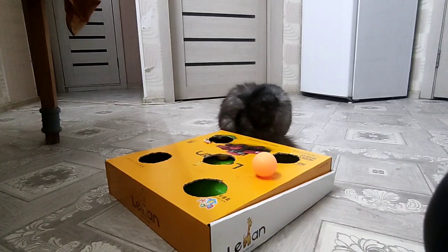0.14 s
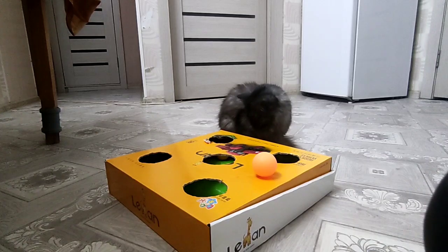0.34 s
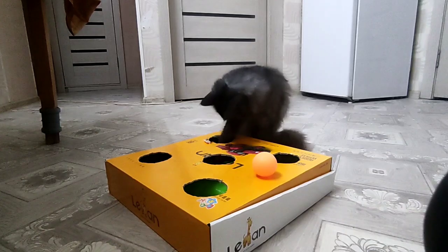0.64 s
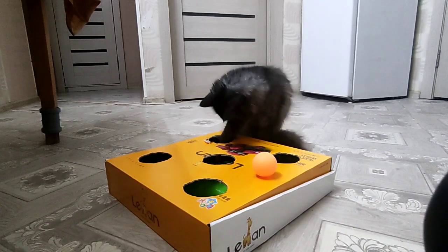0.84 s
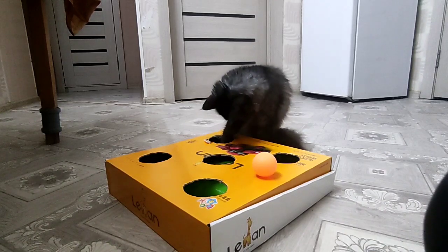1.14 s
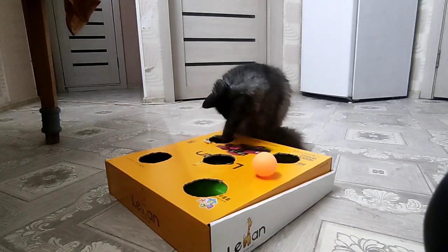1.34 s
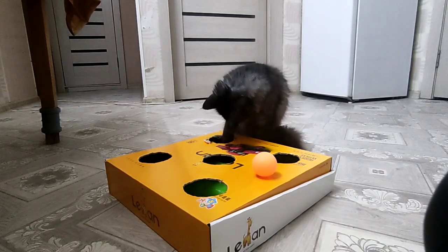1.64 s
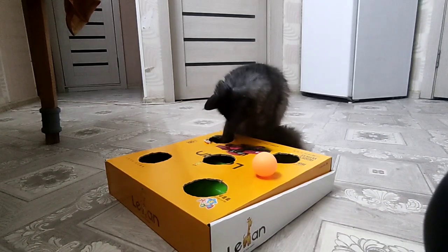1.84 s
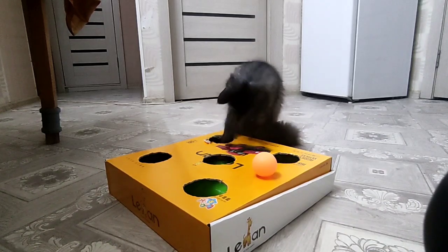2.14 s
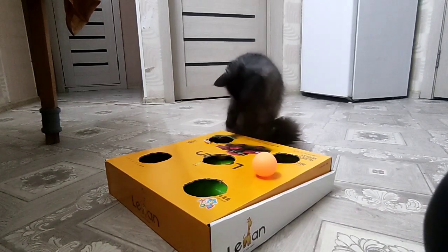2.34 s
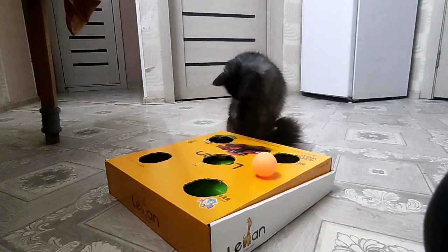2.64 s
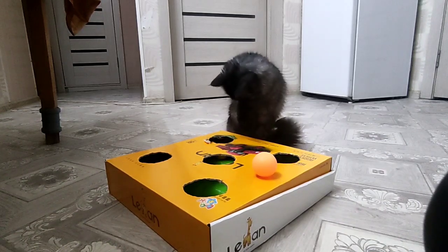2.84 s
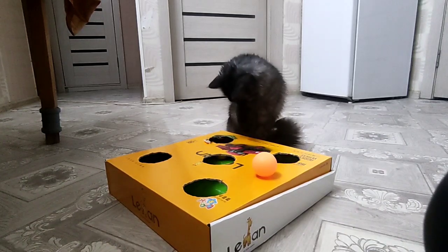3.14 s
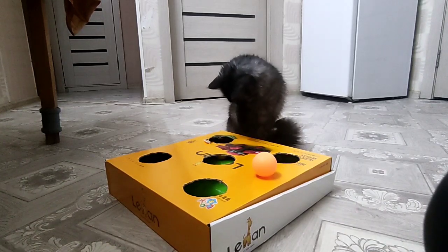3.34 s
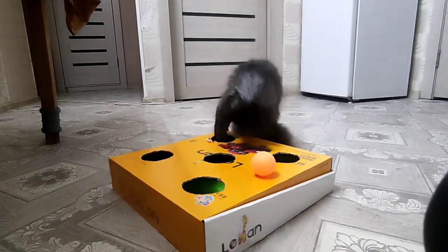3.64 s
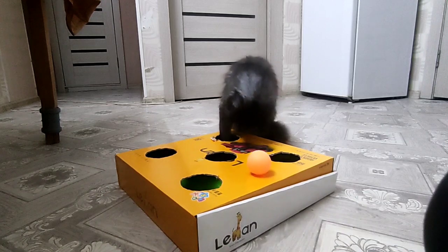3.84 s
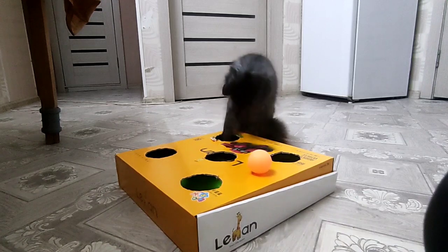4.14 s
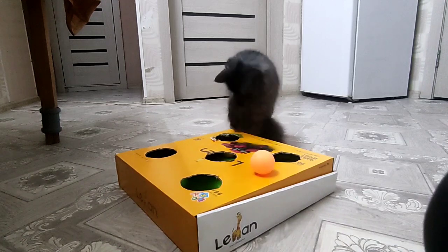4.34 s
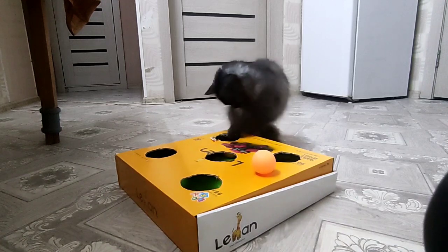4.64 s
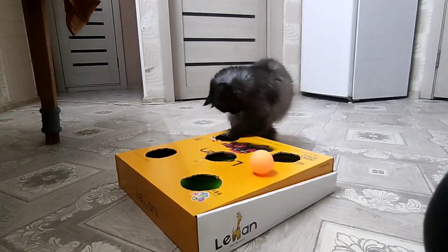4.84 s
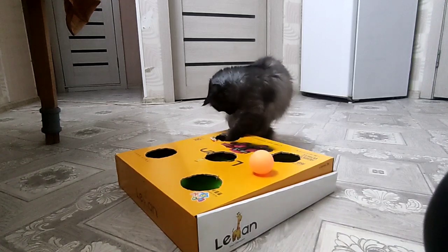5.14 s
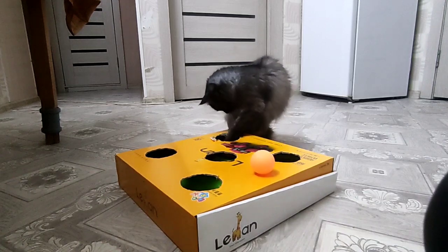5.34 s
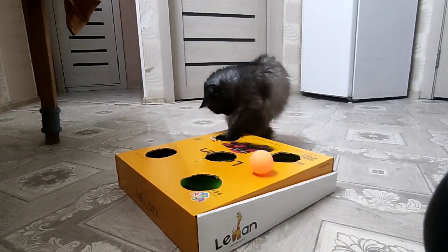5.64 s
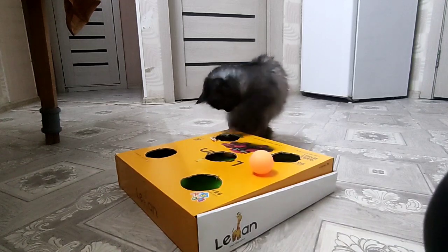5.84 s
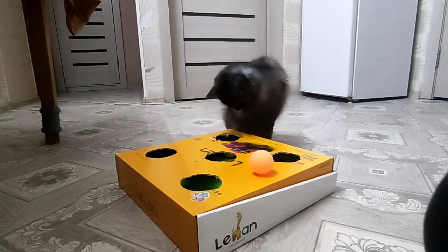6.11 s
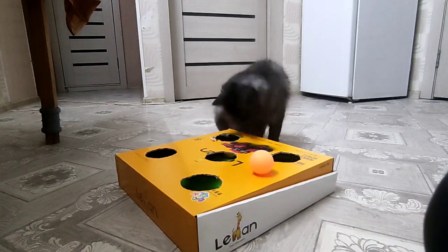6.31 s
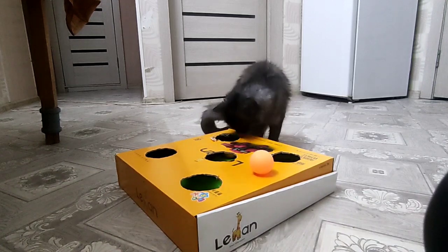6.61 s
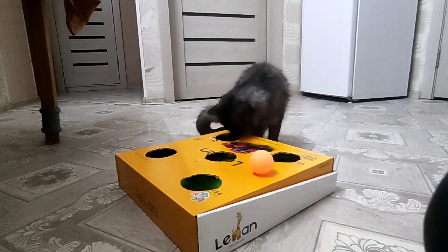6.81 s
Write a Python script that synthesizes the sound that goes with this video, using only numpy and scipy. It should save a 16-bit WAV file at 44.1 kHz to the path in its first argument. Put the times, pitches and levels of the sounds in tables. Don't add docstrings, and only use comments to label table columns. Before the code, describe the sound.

Light, uneven hollow taps on a cardboard box as a cat reaches into its holes, with dry scrapes and tiny clicks in a bare room.

```python
import sys
import numpy as np
from scipy import signal
from scipy.fft import rfft, irfft, next_fast_len
from scipy.io import wavfile
from scipy.ndimage import uniform_filter1d, minimum_filter1d

SR = 44100
rng = np.random.default_rng(int(sys.argv[2]) if len(sys.argv) > 2 else 0)


def to_wav(s):
    ch = np.atleast_2d(s).T
    pcm = np.round(np.clip(ch, -1, 1) * 32767)
    wavfile.write(sys.argv[1], SR, pcm.astype(np.int16))


def boost_factor(decibels):
    exponent = np.asarray(decibels, float) / 20
    return 10 ** exponent


N = 307377


def evened(x):
    return x / np.sqrt(np.mean(x ** 2) + 1e-20)


def read(points, hz):
    f, value = np.transpose(points)
    return np.interp(np.log(hz + 1), np.log(f + 1), value)


def add(mix, start_s, sound):
    part = mix[:, round(start_s * SR):][:, :sound.shape[1]]
    part += sound[:, :part.shape[1]]


def colour(x, gain):
    size = next_fast_len(x.shape[-1])
    spectrum = rfft(x, size) * gain(np.fft.rfftfreq(size, 1 / SR))
    return irfft(spectrum, size)[..., :x.shape[-1]]


def pair(a, b, same):
    def alike(hz):
        return np.clip(read(same, hz), 0, 1)

    def unlike(hz):
        return np.sqrt(1 - alike(hz) ** 2)

    return np.array([a, colour(a, alike) + colour(b, unlike)])


# frequency_hz, density_db [dB per Hz]
HISS_SPECTRUM = [(3.5, -2), (6, 5.5), (17, -4.5), (30, -12.5), (59, -18), (220, -26.5), (530, -34),
                 (900, -37), (1700, -39.5), (4500, -42), (7000, -43), (9000, -40), (11500, -42.5),
                 (14300, -45)]
# frequency_hz, coherence [0 to 1]
HISS_COHERENCE = [(60, 0.085), (180, 0.23), (550, 0.15), (1650, 0.18), (4960, -0.018), (15000, 0.063)]
# frequency_hz, left_minus_right_db
HISS_BALANCE = [(60, -3), (180, -1.5), (550, -1.5), (1650, -0.5), (4960, -1), (15000, 0)]


def hiss(level_db=-54):
    both = pair(*rng.standard_normal((2, N)), HISS_COHERENCE)
    lean = np.array([[.5], [-.5]])
    shaped = colour(both, lambda hz: boost_factor(read(HISS_SPECTRUM, hz) + lean * read(HISS_BALANCE, hz)))
    return boost_factor(level_db) * evened(shaped)


# frequency_hz, t60_s
ROOM_DECAY = [(150, 0.82), (400, 0.53), (1040, 0.42), (2760, 0.34), (7280, 0.36)]
# frequency_hz, level_db
ROOM_TONE = [(150, -4.5), (600, -7.5), (1500, -3), (5000, -1), (12000, -9.5)]
# frequency_hz, coherence [0 to 1]
ROOM_COHERENCE = [(170, .95), (260, .45), (600, .3), (1000, 0), (3000, 0)]
# delay_s, left_db, right_db
ECHOES = [(.0045, -12.5, -26), (.0075, -9.5, -21), (0.0109, -13, -25), (.0145, -22, -27), (.019, -51, -7)]


def room(x, tail_db=-7.0, build_up_s=0.0075, dull_hz=2500):
    hz, t, z = signal.stft(rng.standard_normal((2, SR)), SR, nperseg=256)
    decay_db = -60 * t / read(ROOM_DECAY, hz)[:, None]
    tail = signal.istft(z * boost_factor(decay_db + read(ROOM_TONE, hz)[:, None]), SR, nperseg=256)[1]
    tail = pair(*tail, ROOM_COHERENCE) * np.minimum(np.arange(tail.shape[1]) / SR / build_up_s, 1)
    tail *= boost_factor(tail_db) / np.linalg.norm(tail[0])
    echoes = np.zeros_like(tail)
    for delay_s, *level_db in ECHOES:
        echoes[:, round(delay_s * SR)] = boost_factor(level_db)
    echoes = colour(echoes, lambda hz: 1 / np.sqrt(1 + (hz / dull_hz) ** 2))
    return signal.fftconvolve(x, tail + echoes, axes=1)[:, :N]


def peak(t, s, rise_db_per_s, fall_db_per_s):
    return -np.maximum(rise_db_per_s * (s - t), fall_db_per_s * (t - s))


# loudest_s, fur_db, rise_s, fall_s, judder_db
SWISHES = [(.65, -69.5, 0.23, 0.23, -89), (.774, -50, 0.077, .09, -59), (1.19, -64.5, 0.24, 0.036, -74),
           (1.378, -61.5, 0.3, .4, -77.5), (1.688, -40, 0.021, .02, -45),
           (2.076, -53.5, 0.072, 0.027, -59.5), (2.2, -70, .15, 0.06, -79),
           (2.311, -52, 0.097, 0.15, -61.5), (3.7, -68.5, 0.25, 0.29, -81),
           (4.206, -54.5, 0.082, 0.033, -56.5), (4.89, -61, 0.082, 0.12, -76),
           (5.14, -55.5, 0.14, 0.025, -69), (5.39, -56.5, 0.087, 0.15, -74),
           (5.468, -55.5, 0.055, 0.017, -54.5), (5.611, -51, .1, 0.07, -62),
           (5.708, -61.5, 0.088, 0.13, -84)]
# start_s, length_s, fur_db, fur_sag_db, judder_db
SLIDES = [
    (1.09, 0.034, -69.5, 0, -72),
    (1.706, 0.18, -50, 41, -48.5),
    (2.131, 0.071, -65.5, 4, -56.5),
    (3.745, 0.24, -43, 9.5, -44),
    (4.262, 0.18, -51, 22, -54),
    (5.145, 0.13, -56.5, 9, -58.5),
    (5.458, 0.074, -72, 15, -58),
    (5.792, 0.12, -55, 5, -63),
]


def strokes():
    swing_db = 20
    grip_s = .002
    lift_db_per_s, settle_db_per_s = 278, 88
    t = np.arange(0, N + 32, 32) / SR
    swish, slide, judder = np.zeros((3, len(t)))
    for loudest_s, fur_db, rise_s, fall_s, judder_db in SWISHES:
        shape_db = peak(t, loudest_s, swing_db / rise_s, swing_db / fall_s)
        swish += boost_factor(fur_db + shape_db) ** 2
        judder += boost_factor(judder_db + shape_db) ** 2
    for start_s, length_s, fur_db, sag_db, judder_db in SLIDES:
        lift_db = -lift_db_per_s * np.maximum(t - start_s - length_s, 0)
        sag = peak(t, start_s, swing_db / grip_s, sag_db / length_s)
        slide += boost_factor(fur_db + lift_db + sag) ** 2
        judder += boost_factor(judder_db + peak(t, start_s, swing_db / grip_s, settle_db_per_s)) ** 2
    return [np.interp(np.arange(N) / SR, t, power) for power in (swish, slide, judder)]


def patchy(x, patch_db):
    z = signal.stft(x, nperseg=256)[2]
    patches = uniform_filter1d(rng.standard_normal(z.shape), size=4, axis=-2)
    patches = uniform_filter1d(patches, size=8, axis=-1)
    return signal.istft(z * boost_factor(patch_db * evened(patches)), nperseg=256)[1][..., :N]


# frequency_hz, density_db [dB per Hz]
CARD_CONTACT = [(500, -4), (1000, -9), (2100, -6), (3000, -8), (3600, -11), (4300, -10.5), (5600, -10),
                (7000, -7), (8800, -3.5), (10700, -11), (12500, -14.5), (14300, -27.5)]
# frequency_hz, level_db
SOFT_FUR = [(1000, -12.5), (4500, -2), (7000, -4), (10500, 8.5)]
# frequency_hz, density_db [dB per Hz]
JUDDER_SPECTRUM = [(60, -35), (120, -10.5), (220, -4.5), (290, -1.5), (370, 4), (480, -13), (620, -3.5),
                   (1000, -8.5), (2500, -19.5), (4000, -26.5)]


def brushing(hairs_per_s=7000, spread_db=2.0, bumps_per_s=700):
    swish, slide, judder = strokes()
    size = boost_factor(spread_db * np.minimum(rng.exponential(1, (4, N)), 4)) * rng.choice([-1., 1.], (4, N))
    chance = rng.random((4, N)) * SR
    hairs = size[:2] * (chance[:2] < hairs_per_s)
    hairs = colour(hairs, lambda hz: boost_factor(read(CARD_CONTACT, hz) + read(SOFT_FUR, hz)))
    bumps = colour(size[2:] * (chance[2:] < bumps_per_s), lambda hz: boost_factor(read(JUDDER_SPECTRUM, hz)))
    fur = evened(patchy(pair(*hairs, ROOM_COHERENCE), patch_db=4.0))
    lean = np.array([[1], [-1]])
    swish_pan_db, slide_pan_db = -1, -4
    fur_power = swish * boost_factor(lean * swish_pan_db) + slide * boost_factor(lean * slide_pan_db)
    return np.sqrt(fur_power) * fur + np.sqrt(judder) * evened(pair(*bumps, ROOM_COHERENCE))


# start_s, peak_db, left_minus_right_db
CLAWS = [(.7672, -41, 2), (.7695, -44, 0), (1.0748, -52, -3), (1.6782, -44, -3), (1.6836, -33, -1),
         (1.6893, -30, 0), (1.7735, -44, 0), (2.3142, -37, 0), (2.3262, -42, 0), (3.7460, -33, -4),
         (3.7785, -34, -4), (3.8262, -27, -7), (4.2105, -34, -2), (4.2398, -30, -3), (4.2430, -35, -3),
         (4.2460, -36, -3), (5.1535, -40, -2), (5.8050, -43, -2)]


def claws(t60_s=.005):
    mix, t = np.zeros((2, N)), np.arange(400) / SR
    bursts = rng.standard_normal((len(CLAWS), 2, len(t)))
    bursts = colour(bursts, lambda hz: boost_factor(read(CARD_CONTACT, hz)))
    for (start_s, peak_db, pan_db), noise in zip(CLAWS, bursts):
        tick = noise * boost_factor(-60 * t / t60_s)
        level = boost_factor([[peak_db + pan_db / 2], [peak_db - pan_db / 2]])
        add(mix, start_s, level * tick / abs(tick).max())
    return mix


# start_s, peak_db, pitch_hz, t60_s, slap_db
PATS = [(0.769, -46.5, 820, 0.017, -18), (1.663, -46, 700, 0.02, -26), (1.6832, -17.5, 594, 0.019, -26),
        (1.7727, -25.5, 614, 0.019, -24), (2.0470, -55, 680, 0.016, -23), (2.0640, -48.5, 620, 0.0066, -34),
        (2.1381, -29.5, 626, 0.028, -40), (2.2661, -45, 550, 0.016, -20), (3.7459, -28, 640, 0.022, -14),
        (3.7524, -30.5, 704, 0.0095, -6.5), (3.8119, -27.5, 650, 0.025, -16),
        (3.843, -46, 224, 0.11, -28.5), (3.9610, -43.5, 480, 0.014, -33), (4.017, -43, 204, .1, -28),
        (4.2131, -24, 1160, 0.0044, -18), (4.239, -19, 628, 0.024, -18.5), (4.2668, -29, 630, 0.02, -27),
        (5.1316, -36.5, 423, 0.026, -35), (5.1523, -19.5, 618, .025, -22), (5.468, -28.5, 587, 0.034, -25),
        (5.804, -29, 608, 0.034, -23)]
# pitch_hz, level_db, t60_s
BOX_MODES = [(108, -28.5, 0.041), (225, -29, 0.15), (293, -26, 0.066), (350, -73, 0.076),
             (443.4, -21.5, 0.065), (792, -9.5, 0.019), (1026, -11.5, 0.011), (618, -30, 0.36),
             (683, -32, 0.24)]


def pats():
    pad_rise_s, slap_t60_s = .0006, 0.085
    spot_db, spot_detune = 3.0, .02
    fewest_cycles, most_cycles = 3, 13
    side = np.array([[.5], [1]])
    mix, t = np.zeros((2, N)), np.arange(6000) / SR
    spots = rng.standard_normal((len(PATS), len(BOX_MODES), 3, 1))
    slaps = rng.standard_normal((len(PATS), 2, len(t)))
    slaps = evened(colour(slaps, lambda hz: boost_factor(read(CARD_CONTACT, hz))))
    for (start_s, peak_db, pitch_hz, t60_s, slap_db), spot, noise in zip(PATS, spots, slaps):
        swing_s = side * np.clip(t60_s, fewest_cycles / pitch_hz, most_cycles / pitch_hz)
        ring = -boost_factor(-60 * t / swing_s) * np.sin(2 * np.pi * pitch_hz * t)
        hum_db = -9.0 * max(np.log2(pitch_hz / 650), 0)
        for (mode_hz, mode_db, mode_t60_s), luck in zip(BOX_MODES, spot):
            envelope = boost_factor(mode_db + hum_db + spot_db * luck[:2] - 60 * t / mode_t60_s)
            tuned_hz = mode_hz * (1 + spot_detune * luck[2])
            ring += envelope * np.sin(2 * np.pi * tuned_hz * t)
        knock = ring * (1 - np.exp(-(t / pad_rise_s) ** 2))
        knock /= abs(knock).max(1)[:, None]
        slap = boost_factor(slap_db - 60 * t / slap_t60_s) * noise
        add(mix, start_s, boost_factor(peak_db) * (knock + slap))
    return mix


# frequency_hz, left_minus_right_db
PORTS = [(60, 3), (130, -3.5), (290, -2), (640, 0.5), (1410, -2.5), (3090, 3), (6800, -6.5), (15000, 9)]


def scene():
    box = pats() + claws() + brushing()
    direct = np.array([np.roll(box[0], shift=3), box[1]])
    lean = np.array([[.5], [-.5]])
    return colour(direct + room(box), lambda hz: boost_factor(lean * read(PORTS, hz))) + hiss()


# treble_db, chance [0 to 1 that a patch is lost]
LOSS_CHANCE = [(-66, .008), (-59, .05), (-45, .11)]


def starved(x, low_hz=2400, high_hz=6800):
    hz, t, z = signal.stft(x, SR, nperseg=1024, noverlap=768)
    treble_power = (abs(z[:, hz > high_hz]) ** 2).sum(1).mean(0)
    treble_db = 10 * np.log10(2 * treble_power + 1e-12)
    draw = rng.random((len(hz) // 6 + 1, len(t) // 4 + 1))
    draw = np.kron(draw, np.ones((6, 4)))[:len(hz), :len(t)]
    kept = 1. * (draw > np.interp(treble_db, *np.transpose(LOSS_CHANCE)))
    kept = minimum_filter1d(kept, size=7, axis=1)
    kept[(hz < low_hz) | (hz > high_hz)] = 1
    return signal.istft(z * kept, SR, nperseg=1024, noverlap=768)[1][:, :N]


def roll_off(x):
    return signal.sosfilt(signal.butter(12, 15570, fs=SR, output="sos"), x)


def record(dry, edge_hz=14330, jump_db=11, leak_db=-10):
    limited = colour(dry, lambda hz: boost_factor(-70.0 * np.clip((hz - edge_hz) / 100, 0, 1)))
    top = dry - limited
    power = uniform_filter1d((top ** 2).mean(0), size=200)
    sharp = power > boost_factor(jump_db) ** 2 * np.roll(power, shift=250)
    limited = limited + boost_factor(leak_db) * top * uniform_filter1d(1. * sharp, size=200)
    return roll_off(starved(limited))


dry = scene()
out = record(dry)
to_wav(out)
```